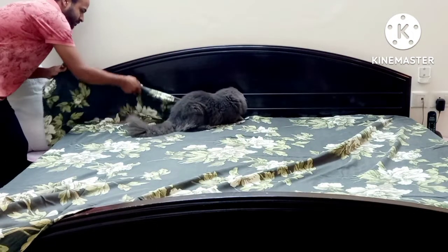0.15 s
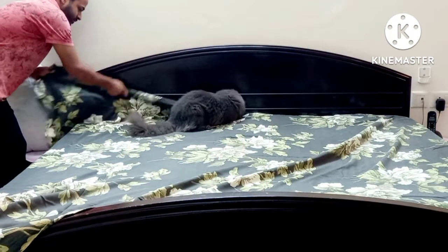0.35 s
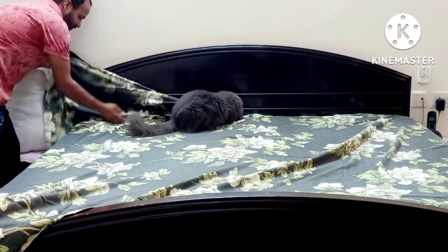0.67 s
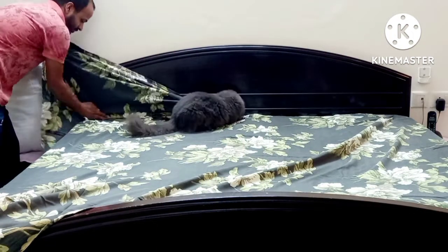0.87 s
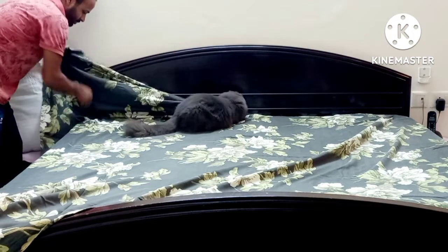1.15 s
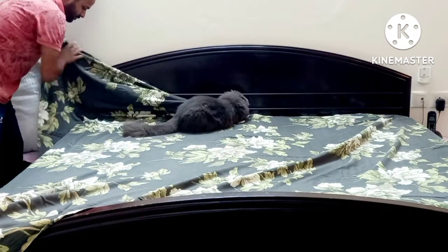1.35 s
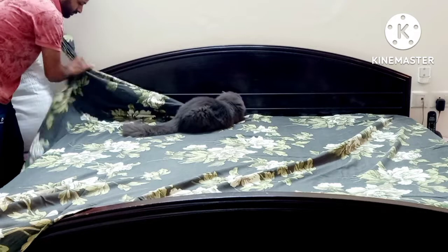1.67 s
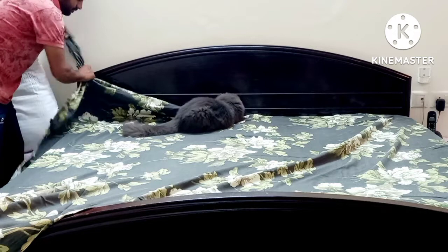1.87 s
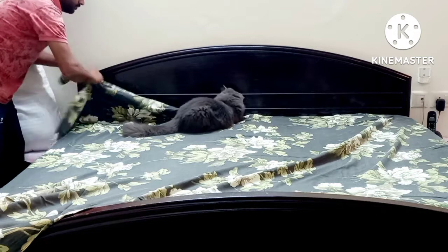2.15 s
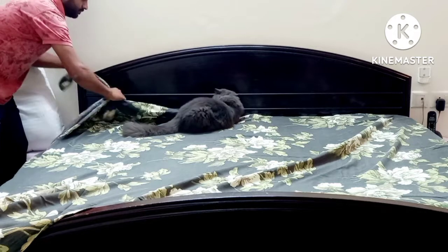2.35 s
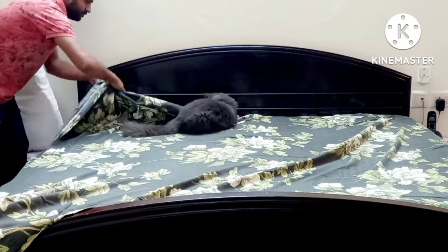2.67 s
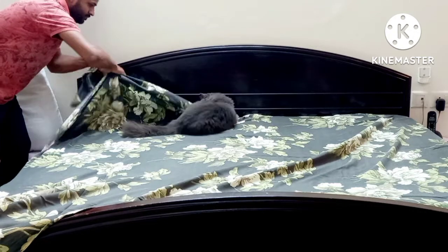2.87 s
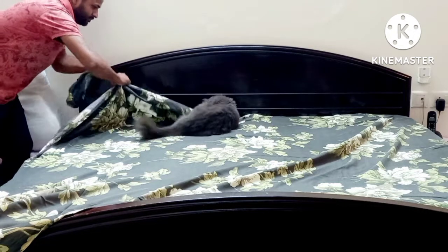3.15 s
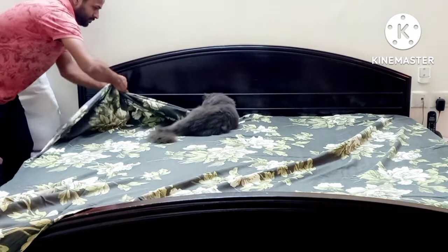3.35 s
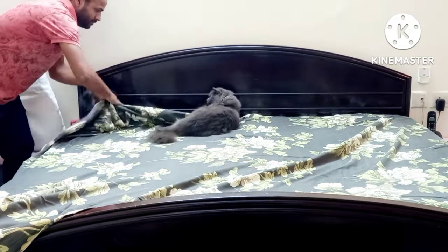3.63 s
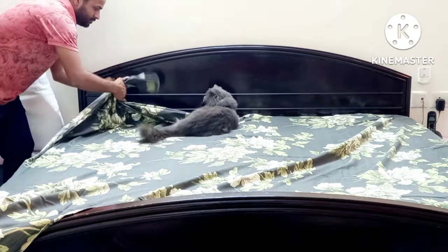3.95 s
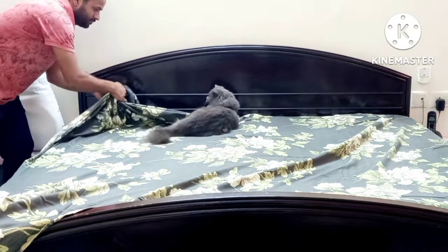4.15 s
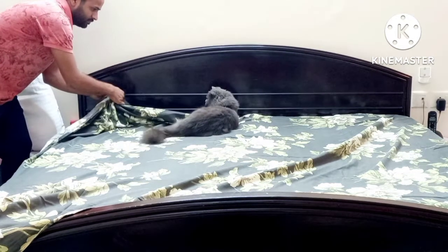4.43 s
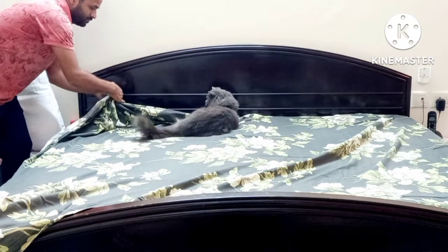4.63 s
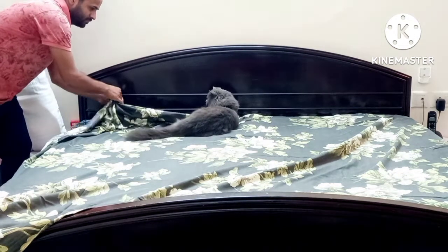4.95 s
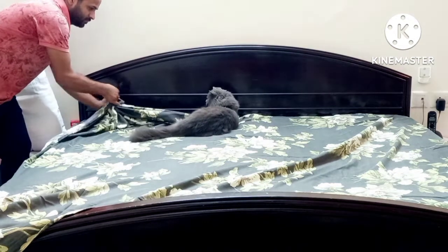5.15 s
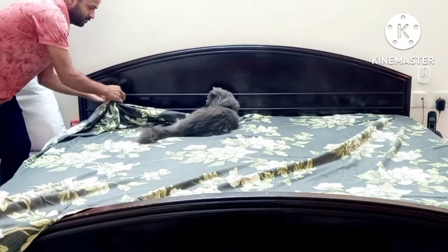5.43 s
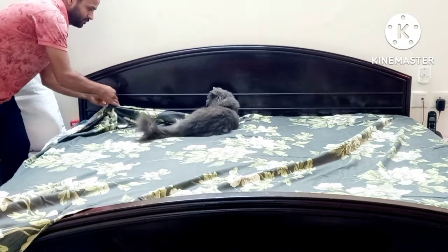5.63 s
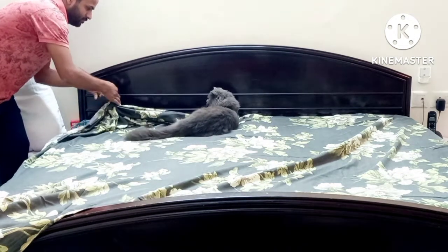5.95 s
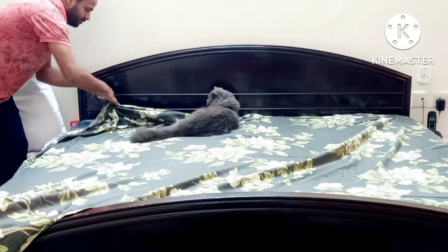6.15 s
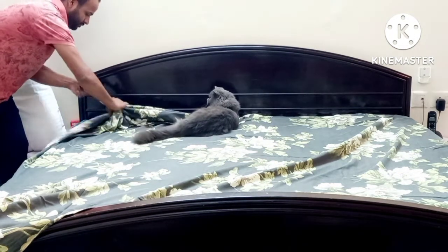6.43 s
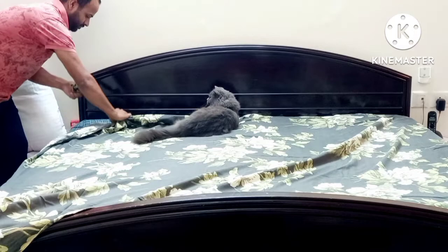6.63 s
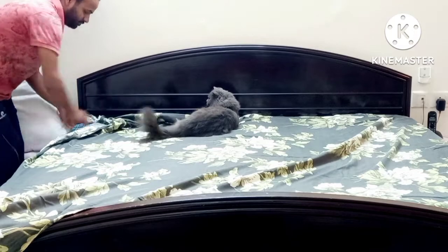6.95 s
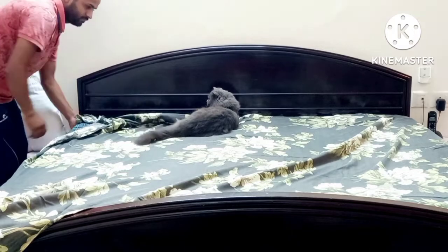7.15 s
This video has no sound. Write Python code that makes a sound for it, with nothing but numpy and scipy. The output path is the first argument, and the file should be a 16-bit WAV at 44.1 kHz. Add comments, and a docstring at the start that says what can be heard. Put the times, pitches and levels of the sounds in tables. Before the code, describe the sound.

Steady air conditioner rush and hum indoors, with two soft thumps on a wooden bed and faint swishes of a sheet.

```python
"""First comes the steady rush of a bedroom air conditioner, as air tumbles through its grille.
Its fan sings many tones, all tied to one spinning shaft, and its compressor hums low underneath.
On the left someone pulls a sheet over a wooden bed: the threads catch and slip with a faint swish.
Twice the bed thumps softly, as padded blows make its frame ring."""
import sys
import numpy as np
from scipy import signal
from scipy.fft import rfft, irfft
from scipy.io import wavfile
from scipy.ndimage import uniform_filter1d

SR = 44100
rng = np.random.default_rng(int(sys.argv[2]) if len(sys.argv) > 2 else 0)


def generate_wav(sig):
    """Save sig (samples, or channels by samples) to the path in sys.argv[1] as 16-bit PCM at SR."""
    pcm = np.round(np.clip(np.atleast_2d(sig).T, -1, 1) * 32767).astype(np.int16)
    wavfile.write(sys.argv[1], SR, pcm)


N = 321489
T = np.arange(N) / SR
FREQ = np.fft.rfftfreq(N, 1 / SR)

# rumble of the casing in the room: f/Hz, level/dB per Hz
CASING_RUMBLE = [(20, -89), (35, -83.5), (48, -75), (75, -70), (110, -61), (140, -62.5), (170, -70),
                 (250, -68.5), (320, -71), (360, -75), (410, -71.5), (520, -78.5), (690, -83)]
# air through the grille, down to a faint hiss: f/Hz, level/dB per Hz
GRILLE_RUSH = [(770, -74.5), (880, -77), (1100, -85), (1400, -86.5), (1750, -93.5), (1930, -101),
               (2090, -99), (2350, -105), (3000, -112), (4500, -119), (6300, -124), (10000, -124),
               (15000, -123)]
# peaks and dips that duct and room put on the air noise: f/Hz, width/Hz, gain/dB
DUCT_PEAKS = [(169.6, 8.6, 6), (289, 11, 1.5), (405, 7.1, 3), (448, 6.4, 0), (494, 17, -2), (550, 16, 1),
              (630, 4.6, 3.5), (711, 34, -3.5), (1250, 23, 5), (1610, 280, -1), (1705, 45, 3.5),
              (2100, 110, 2.5), (2190, 55, -4.5), (2770, 220, -1.5), (6200, 1900, -2.5)]
# which side the air is louder on: f/Hz, left minus right/dB
AIR_LEAN = [(200, 0.5), (380, 0), (690, 3), (1280, -3.5), (2200, -4.5), (4300, 3), (8000, 0.5)]
# how unlike left and right sound in the room: f/Hz, differing part minus shared part/dB
STEREO_WIDTH = [(60, -18.5), (110, -21.5), (200, -20.5), (380, -8.5), (650, -7), (820, -10.5), (1280, -3.5),
                (2300, 2), (5000, 2)]
# tones of the fan (35 is the rate of passing blades): multiple of the shaft rate, level/dB
FAN_TONES = [(3, -58.4), (5, -47.1), (6, -51.7), (7, -56.3), (9, -55.8), (10, -56.2), (11, -51.4),
             (12, -55.6), (13, -52.7), (14, -62.6), (16, -65.4), (18, -64.1), (19, -69.5), (29, -71.4),
             (35, -61.1), (38, -73.1), (39, -72.0), (41, -74.1), (57, -77.9), (58, -78.1), (61, -77.3),
             (63, -72.5), (66, -77.3), (67, -79.5), (69, -78.6), (72, -77.1)]
# hum of the compressor shaft and the mains power: f/Hz, level/dB
HUM_TONES = [(47.4, -56.5), (50.1, -62), (94.9, -49), (100.1, -50.5), (189.8, -57)]
# strokes of the sheet: fastest moment t/s, level/dB, length/s
SHEET_STROKES = [(.48, -71.5, .08), (.78, -74, 0.14), (1.14, -84, .2), (1.715, -74, 0.16),
                 (2.255, -67.5, 0.13), (2.725, -74.5, 0.15), (3.58, -79, 0.15), (3.79, -80, .11),
                 (6.51, -65, 0.12), (6.985, -76, .1)]
# folds that flick tight, all rub and no hiss: fastest moment t/s, level/dB, length/s
FOLD_FLICKS = [(2.824, -65, .03), (6.922, -65, 0.046)]
# hiss of cloth sliding on cloth: f/Hz, level/dB
CLOTH_HISS = [(1500, -20.5), (3000, -12), (5800, -9.5), (7300, -3), (9500, -1), (11500, -5), (15000, -10)]
# duller rub of the folds: f/Hz, level/dB
CLOTH_RUB = [(400, -7), (1700, .5), (3500, -6), (6500, -12), (14000, -29.5)]
# blows on the bed, four a thump, the last soft and low: t/s, level/dB, centre f/Hz, spread/octaves
BED_BLOWS = [(.784, -22.5, 300, 0.93), (.803, -23, 380, 0.54), (.813, -25.5, 180, 0.78),
             (.835, -22.5, 159, 0.32), (2.444, -27.5, 557, 0.66), (2.455, -29.5, 330, 2.5),
             (2.494, -28.5, 302, 1.8), (2.517, -24.5, 86.4, 0.32)]
# notes the bed frame rings at: f/Hz, level/dB, time to fade by 60 dB/s
FRAME_NOTES = [(92.9, 7.5, 0.28), (136.2, 0, 0.27), (167.3, -10, 0.25), (244.5, -6, 0.5),
               (268.8, 1.5, 0.13), (327.6, -6, 0.084), (399, -6.5, .16), (451, -17, 0.42), (563, -11, 0.17),
               (637, -10, 0.14), (758, -11, .12)]
# dull thud of the mattress: f/Hz, level/dB
MATTRESS_THUD = [(40, -25.5), (90, -16), (300, 7.5), (750, -.5), (1500, -7), (3000, -56.5)]


def gain(db):
    """Turn decibels into a number to multiply by."""
    return 10 ** (np.asarray(db) / 20)


def curve(points):
    """Join a table's (f/Hz, value) points into a value for every frequency."""
    hz, value = np.transpose(points)
    return np.interp(np.log(FREQ + 1), np.log(hz), value)


def unit(x):
    """Scale a signal to an average power of 1."""
    return x / np.sqrt(np.mean(x ** 2))


def shaped(x, gains):
    """Turn each frequency up or down, then scale to power 1."""
    return unit(irfft(rfft(x) * gains, N))


def wander(rate_hz):
    """A smooth random wiggle that changes about rate_hz times a second."""
    return shaped(rng.standard_normal(N), np.exp(-(FREQ / rate_hz) ** 2))


def stereo(shared, differing):
    """Make left and right: alike in the bass, unlike in the treble."""
    width = gain(curve(STEREO_WIDTH))
    mid, side = rfft(shared), rfft(differing) * width
    return irfft(np.array([mid + side, mid - side]) / np.sqrt(1 + width ** 2), N)


def wall_ripple(depth_db=1.3, width_hz=16):
    """Wall echoes leave small peaks and dips, in dB, on each side; the bass stays even."""
    size = int(width_hz * N / SR) + 1
    bumps = uniform_filter1d(rng.standard_normal((2, len(FREQ))), size)
    bumps = uniform_filter1d(bumps, size)
    return depth_db * unit(bumps) * np.clip(FREQ / 500 - 1, 0, 1)


def rushing_air(flutter_db=1.07, flutter_hz=8.2):
    """Tumbling air makes noise, shaped by casing, duct and room; each octave flutters on its own."""
    noise = stereo(*rng.standard_normal((2, N))) * np.sqrt(SR / 2)
    rush_db = curve(list(CASING_RUMBLE) + list(GRILLE_RUSH))
    duct_db = sum(db / (1 + (2 * (FREQ - hz) / width) ** 2) for hz, width, db in DUCT_PEAKS)
    lean_db = curve(AIR_LEAN) * np.array([[.5], [-.5]])
    spectrum = rfft(noise) * gain(rush_db + duct_db + wall_ripple() + lean_db)
    octave = np.log2(np.clip(FREQ, 125, 4000) / 125)
    out = 0
    for k, share in enumerate([1, 1, 1, 1, 1, .3]):  # the top hiss hardly flutters
        band = irfft(spectrum * np.maximum(1 - abs(octave - k), 0), N)
        out += band * gain(share * flutter_db * wander(flutter_hz))
    return out


def wavering_tone(cycles, hz, waver, waver_hz, wider_db=0):
    """One tone that moving air makes waver; its wave is a little ahead on the left."""
    width_db = np.interp(np.log(hz), np.log(FREQ + 1), curve(STEREO_WIDTH)) + wider_db
    side = gain(width_db) * np.exp(1j * rng.uniform(np.pi / 4, 3 * np.pi / 4))
    # complex numbers let both loudness and timing wobble
    mid_wobble, side_wobble = (1 + waver * (wander(waver_hz) + 1j * wander(waver_hz)) for _ in range(2))
    left_right = np.array([mid_wobble + side * side_wobble, mid_wobble - side * side_wobble])
    wave = np.exp(2j * np.pi * (cycles + rng.random()))
    power = (1 + abs(side) ** 2) * (1 + 2 * waver ** 2) / 2
    return np.real(left_right * wave) / np.sqrt(power)


def fan(shaft_hz=21.865, drift=.0005, level_db=-.05):
    """All tones follow one shaft whose speed drifts a little; higher ones waver more."""
    turns = np.cumsum(shaft_hz * (1 + drift * wander(.54))) / SR
    out = 0
    for multiple, db in FAN_TONES:
        hz = multiple * shaft_hz
        waver = .16 + .4 * hz / 1000
        # the blade whine forms standing waves in the room, so left and right differ more
        wider_db = 6 if 700 < hz < 1000 else 0
        tone = wavering_tone(multiple * turns, hz, waver, waver_hz=2.5, wider_db=wider_db)
        out += gain(db + level_db) * tone
    return out


def compressor():
    """The motor turns just under mains speed, so the two hums throb against each other."""
    return sum(gain(db) * wavering_tone(hz * T, hz, waver=.12, waver_hz=1.5) for hz, db in HUM_TONES)


def pull_power(pulls, rise_share=.38):
    """Rubbing power of hand movements that speed up quickly and slow down more gently."""
    power = np.zeros(N)
    for fastest, db, length in pulls:
        slope_s = length * np.where(T < fastest, rise_share, 1 - rise_share)
        from_peak = np.minimum(1.24 * abs(T - fastest) / slope_s, 20)
        power += (gain(db) / np.cosh(from_peak)) ** 2
    return power


def sheet(rub_db=-1, catch_db=1.2, right_db=-17, echo_db=-17):
    """Threads catch and slip: sliding cloth hisses, and tight folds rub with a lower sound."""
    rustle_db = -93.5 + 4.5 * wander(3)  # the handled cloth never quite rests
    slide_power = pull_power(SHEET_STROKES) + gain(rustle_db) ** 2
    rub_power = slide_power * gain(rub_db) ** 2 + pull_power(FOLD_FLICKS)
    grains = rng.standard_normal((2, N)) * gain(catch_db * wander(50))
    hiss = np.sqrt(slide_power) * shaped(grains[0], gain(curve(CLOTH_HISS)))
    rub = np.sqrt(rub_power) * shaped(grains[1], gain(curve(CLOTH_RUB)))
    cloth = hiss + rub
    return np.array([cloth, gain(right_db) * cloth]) + gain(echo_db) * room_echo(cloth, fade_s=.4)


def room_echo(x, fade_s):
    """Many reflections blur into one bedroom echo that drops 60 dB in fade_s."""
    t = T[:SR // 2]
    tails = rng.standard_normal((2, len(t))) * gain(-60 * t / fade_s) * (t > .004)
    return stereo(*(signal.fftconvolve(x, tail / np.linalg.norm(tail))[:N] for tail in tails))


def bed_thumps(thud_db=-11, thud_fade_s=.2, build_cycles=.93, settle_s=.2, settle_db=-15, echo_db=-9):
    """Each padded blow rings the frame's notes near its own pitch, and the mattress adds a dull thud."""
    # each thump's last blow returns once as the mattress settles
    settling = [(start + settle_s, db + settle_db, hz, span) for start, db, hz, span in BED_BLOWS[3::4]]
    out = np.zeros(N)
    for start, db, centre_hz, octaves in list(BED_BLOWS) + settling:
        t = np.maximum(T - start, 0)
        def nearness(hz):
            return np.exp(-.5 * (np.log2(hz / centre_hz) / octaves) ** 2)
        ring = sum(gain(note_db - 60 * t / fade_s) * nearness(hz) * np.sin(2 * np.pi * hz * t)
                   for hz, note_db, fade_s in FRAME_NOTES)
        thud = shaped(rng.standard_normal(N), nearness(FREQ + 1) * gain(curve(MATTRESS_THUD)))
        thud *= gain(thud_db - 60 * t / thud_fade_s)
        build_up = 1 - np.exp(-(t * centre_hz / build_cycles) ** 2)  # low blows start more softly
        out += gain(db) * build_up * (ring + thud)
    return stereo(out, np.zeros(N)) + gain(echo_db) * room_echo(out, fade_s=.35)


def scene(right_delay_s=.0001):
    """Add up machine, sheet and bed; the right side hears it all a moment later."""
    left, right = rushing_air() + fan() + compressor() + sheet() + bed_thumps()
    late_right = np.pad(right, (round(right_delay_s * SR), 0), mode="edge")[:N]
    return np.array([left, late_right])


def record(dry, low_hz=37, top_hz=15350):
    """Fade in over 3 ms, then cut the deepest bass and the highest treble."""
    faded = dry * np.minimum(T / .003, 1)
    thinned = signal.sosfilt(signal.butter(6, low_hz, "highpass", fs=SR, output="sos"), faded)
    return signal.sosfilt(signal.ellip(10, .1, 80, top_hz, fs=SR, output="sos"), thinned)


dry = scene()
out = record(dry)
generate_wav(out)
```